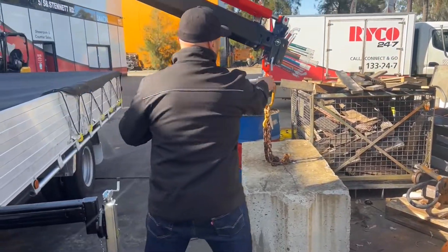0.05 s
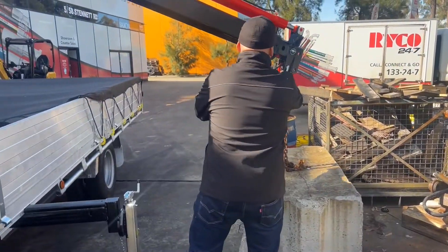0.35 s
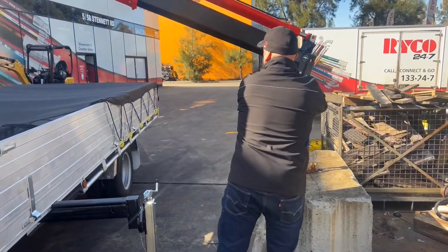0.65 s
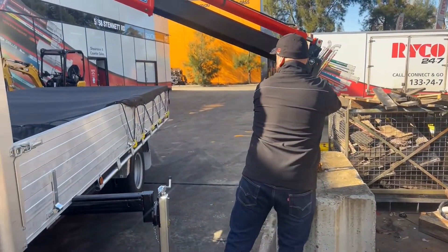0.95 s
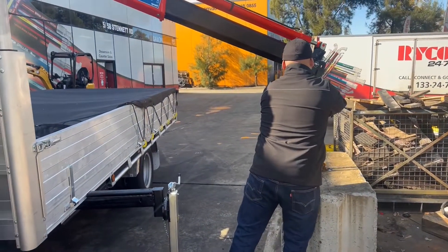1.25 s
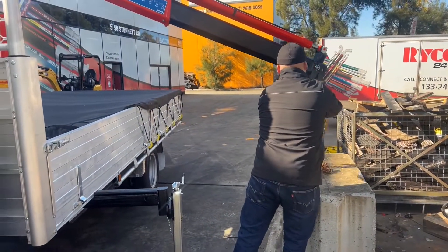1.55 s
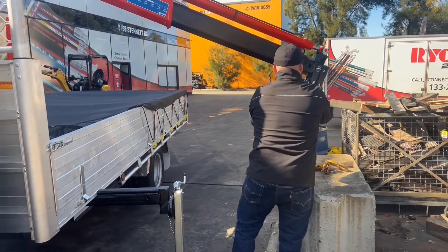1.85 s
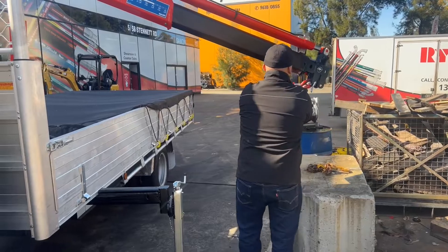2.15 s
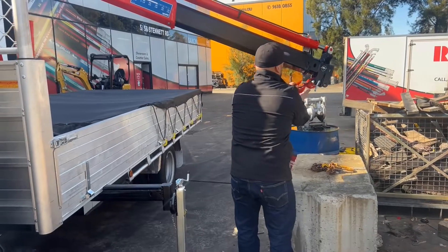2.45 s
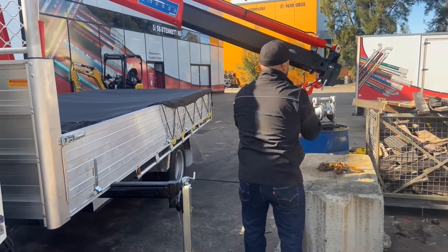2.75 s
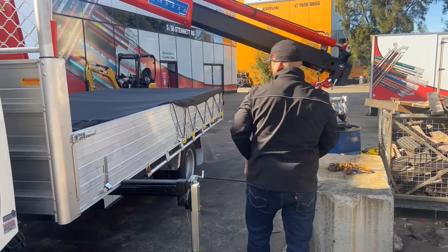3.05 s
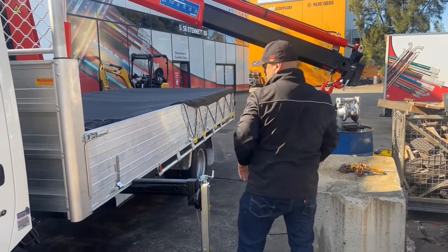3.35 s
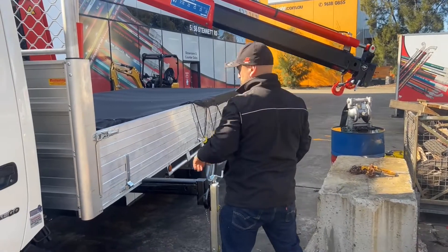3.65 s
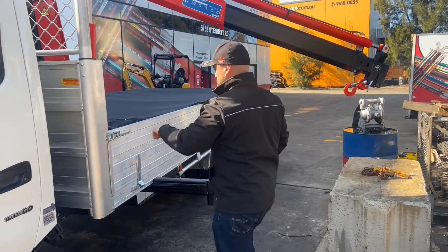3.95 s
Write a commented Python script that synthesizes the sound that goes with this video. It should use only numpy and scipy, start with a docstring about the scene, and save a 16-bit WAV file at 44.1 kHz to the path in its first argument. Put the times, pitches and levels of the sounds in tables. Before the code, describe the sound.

A metal chain rattles lightly nearby, slips from a hook with a rasp and a sharp ringing clink, and drops onto a concrete block in three double clacks. Low wind and far machinery noise fill the outdoor yard.

```python
"""Chain off a crane hook

An open yard, a phone's stereo microphone close to a steel chain being worked off a hook and let down on a
concrete block. The links shift and ring against each other, scrape over the hook with one loud clink and jangle
on; the last ones land in three dead double clacks. A jacket rustles faintly nearby. Farther off, an engine and
machinery rumble throughout, and trucks and walls return a short echo."""
import sys
import numpy as np
from scipy import signal
from scipy.fft import rfft, irfft
from scipy.io import wavfile
from scipy.ndimage import uniform_filter1d

SR = 44100
rng = np.random.default_rng(int(sys.argv[2]) if len(sys.argv) > 2 else 0)


def file_out(sig):
    """Save sig as 16-bit WAV at sys.argv[1]."""
    # one column per channel
    cols = np.atleast_2d(sig).T
    # limit, then scale
    lim = np.clip(cols, -1, 1)
    pcm = np.round(lim * 32767).astype(np.int16)
    wavfile.write(sys.argv[1], SR, pcm)


N = 176400
TIME, FREQS = np.arange(N) / SR, np.arange(N // 2 + 1) * SR / N


def from_db(db):
    """Decibels to gain."""
    return 10 ** (np.asarray(db) / 20)


def rms_one(x):
    """Scale to unit rms."""
    return x / np.sqrt(np.mean(x ** 2) + 1e-20)


def level(points):
    """Gain over time from (seconds, dB) points."""
    return from_db(np.interp(TIME, *np.transpose(points)))


def over_hz(points):
    """Join (Hz, value) points on a log-frequency axis."""
    hz, value = np.transpose(points)
    return np.interp(np.log(FREQS + 1), np.log(hz), value)


def noise(colour, likeness, tilt_db=0):
    """Stereo noise of a given colour and left-right correlation; rms 1."""
    mid, side = rfft(rng.standard_normal((2, N)))
    alike = np.clip(over_hz(likeness), -1, 1)
    stereo = np.sqrt(1 + alike) * mid + np.sqrt(1 - alike) * side * [[1], [-1]]
    gain = from_db(over_hz(colour) + tilt_db * np.log2(1 + FREQS / 1000))
    return rms_one(irfft(gain * stereo, N))


def grain(depth_db):
    """Fast random flutter of a rough contact; rms 1."""
    roughness = rms_one(uniform_filter1d(rng.standard_normal(N), size=60))
    return rms_one(from_db(depth_db * roughness))


def dying(start, t60, rise=1e-4):
    """Envelope: a straight rise, then an exponential decay."""
    age = TIME - start
    return np.clip(age / rise, 0, 1) * from_db(-60 * np.clip((age - rise) / t60, 0, 4))


# Low rumble and machinery across the yard. Each row: time in seconds, level in dB.
RUMBLE_LEVEL = [(.4, -30.5), (.51, -25), (.6, -29), (2.35, -32), (2.5, -29), (2.8, -29.5), (4, -33.5)]
MACHINERY_LEVEL = [(.9, -31), (1.4, -33.5), (3.4, -35), (4, -33)]
# Their colours. Each row: frequency in Hz, level in dB.
RUMBLE_COLOUR = [(20, -23), (32, -3), (42, 0), (52, 6), (66, 7.5), (80, 7.5), (100, -3), (130, -11.5),
                 (200, -52)]
MACHINERY_COLOUR = [(60, -11.5), (115, 2.5), (160, -4), (205, -2), (255, -10.5), (310, -8.5), (500, -14.5),
                    (1000, -17), (1500, -24), (4000, -38), (7000, -41.5), (12000, -61), (16000, -70)]
# Distant sound at the microphone. Each row: frequency in Hz, left-right correlation.
FAR_LIKENESS = [(60, 1), (130, 0.91), (250, 0.81), (550, -0.23), (1300, -0.5), (2300, 0.29), (7500, 0.0094),
                (9500, 1)]


def rumble_and_machinery():
    """A swelling low rumble lies under the even noise of distant machinery."""
    low_cut = signal.butter(4, 30, "high", fs=SR, output="sos")
    rumble = signal.sosfilt(low_cut, noise(RUMBLE_COLOUR, FAR_LIKENESS))
    rumble /= np.sqrt(uniform_filter1d(np.mean(rumble ** 2, axis=0), size=6000))  # even out chance swells
    machinery = noise(MACHINERY_COLOUR, FAR_LIKENESS)
    return level(RUMBLE_LEVEL) * rumble + level(MACHINERY_LEVEL) * machinery


# Sleeves moving nearby. Each row: middle in seconds, half length in seconds, level in dB.
SWISHES = [(0.4, 0.068, -50), (1.153, 0.016, -49.5), (1.338, 0.029, -47), (2.727, 0.041, -47),
           (3.683, 0.019, -48)]
# Rubbing cloth. Each row: frequency in Hz, level in dB.
CLOTH_COLOUR = [(1500, 4.5), (4000, -1), (8000, -4), (12000, 0), (16000, -14)]
# Close sound at the microphone. Each row: frequency in Hz, left-right correlation.
NEAR_LIKENESS = [(300, 0.99), (900, 0.099), (2000, 0.95), (4500, 0.25), (7000, 0.51), (9000, 1)]


def jacket():
    """Cloth swishes softly near the microphone as the arms move."""
    swells = sum(from_db(db) * np.exp(-((TIME - middle) / half) ** 2) for middle, half, db in SWISHES)
    return swells * noise(CLOTH_COLOUR, NEAR_LIKENESS)


def resonate(touches, hz, t60):
    """One resonance set ringing by a run of touches."""
    radius, angle = np.exp(-np.log(1000) / (t60 * SR)), 2 * np.pi * hz / SR
    return signal.lfilter([np.sin(angle)], [1, -2 * radius * np.cos(angle), radius ** 2], touches + 1e-18)


# Links sliding over each other. Each row: time in seconds, level in dB.
SLIDE_LEVEL = [(.78, -65), (.86, -43.5), (1.03, -40.5), (1.12, -48), (1.195, -50), (1.215, -41.5),
               (1.26, -54), (1.6, -52), (1.68, -29), (1.76, -40), (1.87, -37.5), (2.06, -37.5), (2.15, -77)]
# Rusty steel rubbing, heard close. Each row: frequency in Hz, level in dB.
GRIT_COLOUR = [(400, -21), (1000, 4), (2600, 5), (5000, -6), (9000, -1), (15000, -14)]


def sliding(links=28, low_hz=2200, high_hz=8000, touches_per_s=60, ring_db=-6, grit_db=-8):
    """Small touches briefly ring many taut links of scattered pitch, over the grit of rusty steel."""
    force, jangle = level(SLIDE_LEVEL), 0
    scatter = (np.arange(links) + rng.random(links)) / links
    for hz in low_hz * (high_hz / low_hz) ** scatter:
        touches = force * (rng.random(N) < touches_per_s / SR) * rng.standard_normal(N)
        jangle = jangle + resonate(touches, hz, t60=.05) / hz
    jangle = rms_one(jangle) * np.sqrt(np.mean(force ** 2))
    grit = force * grain(depth_db=1) * noise(GRIT_COLOUR, NEAR_LIKENESS)
    return from_db(ring_db) * jangle + from_db(grit_db) * grit


def waver(age, depth_db=2, per_s=70):
    """Gain of one mode on each side of the microphone as its link swings and turns."""
    turns = from_db(depth_db * rng.standard_normal((2, per_s + 2)))
    return np.array([np.interp(age * per_s, np.arange(len(side)), side) for side in turns])


def strike(modes, start, db, free_s=1, detune=.0006, pinched_t60_s=.16, spread_db=1):
    """One blow: the modes ring, a little off pitch each time, until a neighbouring link pinches them."""
    out, age, first = np.zeros((2, N + SR)), TIME[:SR], int(start * SR)
    pinch = from_db(-60 * np.maximum(age - free_s, 0) / pinched_t60_s)
    stretch = 1 + detune * rng.uniform(-1.07, 1)
    for hz, mode_db, t60, pan_db in modes:
        tone = np.sin(2 * np.pi * hz * stretch * age) * from_db(-60 * age / t60)
        gain = from_db(db + mode_db + spread_db * rng.standard_normal())
        pan = from_db([[pan_db / 2], [-pan_db / 2]])
        out[:, first:first + SR] += gain * pan * tone * pinch * waver(age)
    return out[:, :N]


# Steel meets steel, close by. Each row: start in seconds, part struck, ring level in dB,
# crack level in dB, seconds until a neighbour pinches it.
CLINKS = [(.802, "oval link", -39, -44, 0.016), (0.985, "end link", -40, -33.5, 0.09),
          (1.016, "oval link", -38, -51, 0.049), (1.016, "long link", -46.5, -49, 0.055),
          (1.516, "end link", -53, -33.5, 0.022), (1.625, "oval link", -38, -25, .01),
          (1.642, "top link", -26, -42, 0.016), (1.653, "end link", -30, -41, 0.014),
          (1.664, "heavy link", -35, -38, .03), (1.687, "heavy link", -30.5, -21, .01),
          (1.695, "hook", -19, -6.5, 0.15), (1.696, "oval link", -23, -17, .09),
          (1.708, "end link", -19.5, -27, 0.1), (1.718, "top link", -29, -36, 0.042),
          (1.731, "short link", -25.5, -38, 0.037), (1.792, "end link", -32, -42, 0.0096),
          (1.811, "heavy link", -35, -42, 0.093), (1.838, "long link", -43, -35.5, 0.099),
          (1.912, "end link", -35, -28, 0.0032), (1.94, "short link", -33.5, -33, .025),
          (1.967, "heavy link", -33, -29.5, 0.032), (1.978, "oval link", -33, -39, 0.037),
          (2.003, "long link", -34.5, -50, 0.033), (2.011, "short link", -39, -48, 0.034)]
# Modes of the hook and each kind of link. Each row: frequency in Hz, level in dB,
# seconds to fall 60 dB, left minus right in dB.
PART_MODES = {"hook": [(2417, -3, .6, -2), (2428, -9, .6, -2), (2929, -12, .3, 1), (10975, 0, .15, 1),
              (12255, 0, .1, 1)], "end link": [(4743, -2, .25, 4), (4815, -9, .25, 4), (6251, -8, .2, -2),
              (6294, -4, .2, -2), (8468, -7, .25, 1), (8534, -2, .25, 1), (9120, -7, .17, -3),
              (12240, -7, .14, 1), (14570, -9, .17, 2)], "top link": [(3947, 0, .25, 4),
              (6778, -5, .2, -1)], "heavy link": [(930, -7, .5, -2), (1565, -8, .2, 0), (2189, 0, .35, -5)],
              "short link": [(2440, -1, .07, 3), (6754, 0, .25, -1), (11374, -5, .15, 5)],
              "oval link": [(7545, 0, .2, -3), (11000, -6, .12, 1)], "long link": [(2428, 2, .4, -2),
              (4965, 0, .45, 9)]}
# Bare steel contact. Each row: frequency in Hz, level in dB.
STEEL_COLOUR = [(300, -21), (800, -7), (1500, -14), (2700, 1.5), (3400, -6.5), (4800, 4), (5700, -4),
                (7000, -2.5), (9500, 0.5), (12300, 1.5), (13400, -8), (16000, -9)]


def clinks(crack_t60_s=.022, tail_t60_s=.08, tail_db=-16):
    """Each blow gives a sharp crack and rings one part of the chain or the hook."""
    cracks = rings = 0
    for start, part, ring_db, crack_db, free_s in CLINKS:
        envelope = dying(start, crack_t60_s) + from_db(tail_db) * dying(start, tail_t60_s)
        cracks = cracks + from_db(crack_db) * envelope
        rings = rings + strike(PART_MODES[part], start, ring_db, free_s)
    return rings + cracks * noise(STEEL_COLOUR, NEAR_LIKENESS)


# The yard's reflections, duller at the top. Each row: frequency in Hz, level in dB.
ECHO_COLOUR = [(7000, 0), (15000, -11)]


def yard_echo(sound, db=-16, delay_s=.012, t60_s=.35):
    """Scattered reflections reach the microphone from the trucks and walls around."""
    tail = (noise(ECHO_COLOUR, FAR_LIKENESS) * dying(delay_s, t60_s))[:, :SR]
    tail /= np.sqrt(np.sum(tail ** 2) / 2)
    return from_db(db) * signal.fftconvolve(sound, tail, axes=1)[:, :N]


# The end link dragging over the hook. Each row: time in seconds, level in dB.
SCRAPE_LEVEL = [(1.5, -103), (1.522, -39), (1.6, -45), (1.648, -28), (1.70, -30.5), (1.74, -64)]


def scraping():
    """Steel on steel makes a bright rough rasp that swells until the end link slips free."""
    return level(SCRAPE_LEVEL) * grain(depth_db=2.5) * noise(STEEL_COLOUR, NEAR_LIKENESS)


# Links landing on the block. Each row: start in seconds, level in dB, rise in seconds,
# treble tilt in dB per octave, knock pitch in Hz, ping pitch in Hz.
CLACKS = [(2.043, -33.5, .002, 3, 2650, 4140), (2.123, -39, .009, -13, 1320, 1550),
          (2.197, -25.5, .005, 4, 1766, 3060), (2.255, -30.5, .009, -0.5, 1493, 5050),
          (2.446, -29.5, .006, 5, 2610, 4530), (2.469, -28.5, .006, 3.5, 1173, 1534),
          (2.551, -28.5, .0018, 5.5, 1747, 5290), (2.588, -33, .003, 0.5, 1716, 3840)]
# Steel on concrete, heard close. Each row: frequency in Hz, level in dB.
CLACK_COLOUR = [(250, -14), (700, 6.5), (1000, 0), (1650, 1), (2800, 0), (3600, -6), (5000, -3),
                (6500, -8.5), (8300, -13), (9800, -20), (11600, -11), (13600, -35), (16000, -26)]
# High link modes damped by the concrete. Each row: frequency in Hz, level in dB,
# seconds to fall 60 dB, left minus right in dB.
DAMPED_MODES = [(7390, -6, 0.06, -7), (7566, 2, 0.074, 6), (8430, -8, 0.05, -6), (12100, -5, 0.049, 4)]


def landings(knock_db=-3, ping_db=-7, damped_db=-3.5, crunch_t60_s=.16, knock_t60_s=.13):
    """Links hit the concrete with a gritty clack, each with its own knock and ping, quickly choked."""
    crunch = rings = 0
    for start, db, rise, tilt_db, knock_hz, ping_hz in CLACKS:
        envelope = from_db(db) * dying(start, crunch_t60_s, rise)
        crunch = crunch + envelope * noise(CLACK_COLOUR, NEAR_LIKENESS, tilt_db)
        own_modes = [(knock_hz, knock_db, knock_t60_s, 0), (ping_hz, ping_db, knock_t60_s, 0)]
        rings = rings + strike(own_modes, start + rise / 2, db)
        rings = rings + strike(DAMPED_MODES, start + rise, db + tilt_db + damped_db, detune=.008)
    return crunch * grain(depth_db=1) + rings


def scene():
    """Chain and jacket close to the microphone, the echo and the yard's noise behind them."""
    chain = sliding() + clinks() + scraping() + landings()
    return rumble_and_machinery() + jacket() + chain + yard_echo(chain)


# The phone's stereo processing shifts the treble phase between the left and right channels.
# Each row: frequency in Hz, lead of the left channel in radians.
CHANNEL_PHASE = [(0, 0), (4800, 0), (5800, -2.1), (6300, -1.8), (6800, 0), (8533, 1.2), (9119, 2.4),
                 (12250, 5.3), (14560, 7)]
# Balance of the channels. Each row: frequency in Hz, left minus right in dB.
CHANNEL_BALANCE = [(50, 0.8), (150, -1.5), (2300, -0.3), (4500, 3), (9000, -0.5)]


def record(dry, peak_limit=.8, cutoff_hz=15800):
    """The phone's two channels differ in level and treble phase; peaks are rounded, the top is cut."""
    lag = np.exp(-1j * np.interp(FREQS, *np.transpose(CHANNEL_PHASE)))
    lean = from_db(over_hz(CHANNEL_BALANCE) / 2)
    channels = irfft(rfft(dry) * np.array([lean, lag / lean]), N)
    rounded = peak_limit * np.tanh(channels / peak_limit)
    low_pass = 1 / np.sqrt(1 + (FREQS / cutoff_hz) ** 200)
    return irfft(rfft(rounded) * low_pass, N)


dry = scene()
out = record(dry)
file_out(out)
```